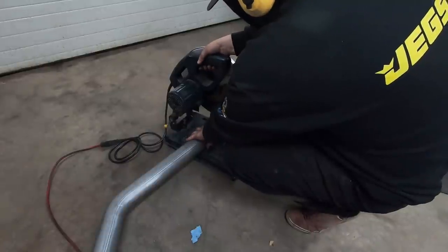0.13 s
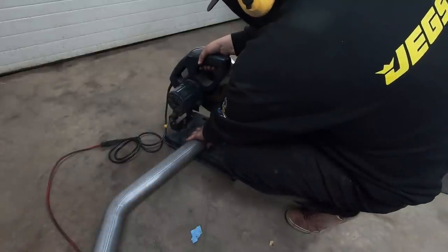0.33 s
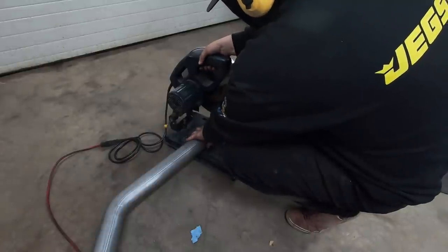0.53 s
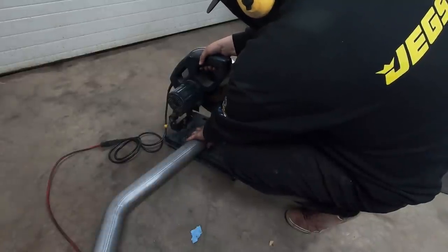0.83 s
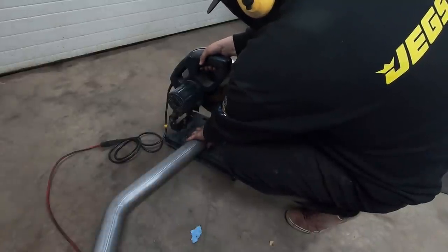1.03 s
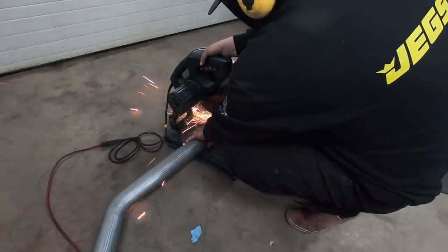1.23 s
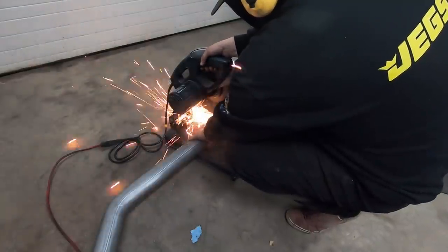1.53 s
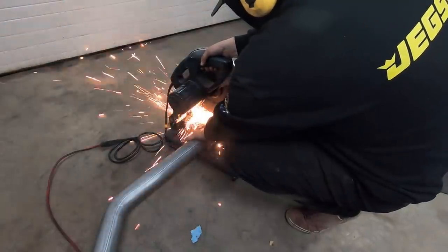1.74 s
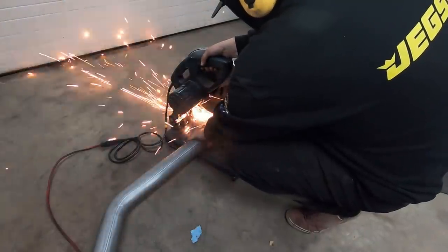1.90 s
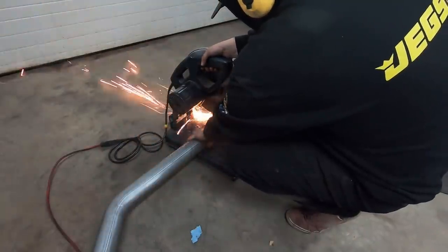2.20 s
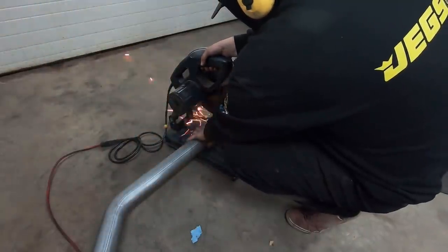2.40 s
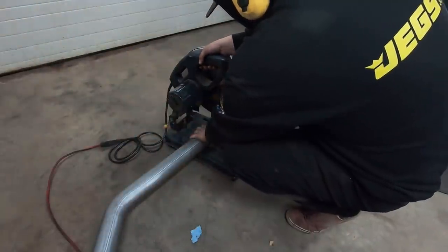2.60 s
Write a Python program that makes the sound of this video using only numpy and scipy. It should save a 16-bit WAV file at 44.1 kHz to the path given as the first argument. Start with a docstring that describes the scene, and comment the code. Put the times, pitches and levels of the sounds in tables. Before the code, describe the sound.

An abrasive chop saw runs freely in a garage, its gear whine rising over a motor roar. Halfway through, it jumps to a shrill, sped-up grinding as it cuts steel pipe, sagging in pitch, then recovering. Heard close by.

```python
"""Abrasive chop saw in a garage

The saw first runs up freely: gear whine over motor roar. Then time runs five times faster, so every
pitch is five times higher: the wheel grinds into steel pipe, slows under load, knocks once a turn and
recovers as it breaks through. The tones are orders, multiples of the wheel's rotation rate; the motor
also drives the fixed resonances of guard, base and pipe."""
import sys
import numpy as np
from scipy import signal
from scipy.fft import rfft, irfft, next_fast_len
from scipy.io import wavfile
from scipy.ndimage import uniform_filter1d, map_coordinates

SR = 44100
rng = np.random.default_rng(int(sys.argv[2]) if len(sys.argv) > 2 else 0)


def master_out(mix):
    """Clip the mix to full scale and print it as 16-bit PCM to the path in sys.argv[1]."""
    frames = np.transpose(np.atleast_2d(mix))
    ceiling = np.clip(frames, -1, 1)
    pcm = np.round(ceiling * 32767).astype(np.int16)
    wavfile.write(sys.argv[1], SR, pcm)


N = 121275
T = np.arange(N) / SR
SPEED_UP_S, SPEED_UP = 1.225, 5
NATURAL, FAST = T < SPEED_UP_S, T >= SPEED_UP_S
TOP_HZ = 15750
EAR_SPLIT = np.array([[.5], [-.5]])  # shares a difference between left and right


def amp(db):
    """Decibels to amplitude ratio."""
    return 10 ** (np.asarray(db) / 20)


def unit(x):
    """Normalisation to an rms of 1."""
    return x / np.sqrt(np.mean(np.abs(x) ** 2) + 1e-20)


def along(points, hz):
    """Interpolation of (frequency or order, value) points on a logarithmic axis."""
    knots, values = np.transpose(points)
    return np.interp(np.log(hz + 1), np.log(knots + 1), values)


def curves(rows):
    """Linear interpolation in time: one curve for each column after the first."""
    times, *columns = np.transpose(rows)
    return [np.interp(T, times, column) for column in columns]


def wobble(clock):
    """Random modulation: a smooth curve with one knot per unit of clock."""
    return map_coordinates(rng.standard_normal(int(clock[-1]) + 3), [clock], order=2)


def filtered(x, response):
    """Linear filtering: the spectrum of x times a frequency response."""
    size = next_fast_len(N + 8192)
    return irfft(rfft(x, size) * response(np.fft.rfftfreq(size, 1 / SR)), size)[..., :N]


def rush(spectrum, correlation, left_db, patch_db):
    """Partially coherent stereo noise of rms 1, its gain patchy in time and frequency."""
    cells = signal.stft(rng.standard_normal((2, N)), nperseg=1024)[2]
    patches = uniform_filter1d(rng.standard_normal(cells.shape[1:]), size=3, axis=0)
    patches = unit(uniform_filter1d(patches, size=6, axis=1))
    pair = signal.istft(cells * amp(patch_db * patches), nperseg=1024)[1][:, :N]
    angle = lambda hz: np.arccos(np.clip(along(correlation, hz), -1, 1)) / 2
    mid, side = filtered(pair, lambda hz: amp(along(spectrum, hz)) * [np.cos(angle(hz)), np.sin(angle(hz))])
    ears = np.array([mid + side, mid - side])
    return unit(filtered(ears, lambda hz: amp(along(left_db, hz) * EAR_SPLIT)))


def tone(order, turns, rms):
    """One order of the rotation, with an interaural phase difference."""
    # Phase lead of the left ear, before a random scaling: order, lead_rad
    leads = [(2, .1), (3, 0.95), (4, .3), (5, 0.065), (13, 0.06), (16, 0.47), (24, 0.65), (43, 1.16),
             (80, 0.79), (130, 0.91)]
    phase = 2 * np.pi * order * turns + rng.uniform(0, 2 * np.pi)
    lead = along(leads, order) * rng.uniform(0.41, 1.04)
    return np.sqrt(2) * rms * np.sin(phase + lead * EAR_SPLIT)


def motor_roar():
    """Broadband machine noise of motor, fan and housing at natural speed."""
    # Envelope: time_s, level_db
    levels = [(0.0, -19), (0.032, -19), (0.464, -19.5), (0.532, -20), (0.55, -19), (1.192, -18.5),
              (1.22, -19)]
    # Spectral density: frequency_hz, relative_db
    spectrum = [(15, -54), (25, -46), (64, -26), (120, -23.5), (180, -14), (317, -20.5), (394, -5),
                (451, -16), (607, -10.5), (734, 2), (818, -6), (1070, -5), (1190, -10), (1700, -7),
                (1940, -5.5), (2280, -8), (3620, -7.5), (5430, -12), (7920, -9), (10100, -16), (11300, -35),
                (14000, -35), (16000, -59)]
    # Likeness of the ears: frequency_hz, correlation
    likeness = [(60, 0.73), (99, 0.54), (160, 0.96), (270, 0.93), (450, 0.91), (740, 0.52), (1220, 0.37),
                (2010, 0.26), (3330, 0.9), (5500, 0.043), (9080, -0.17), (15000, 0.14)]
    # Balance: frequency_hz, left_over_right_db
    balance = [(60, 6), (240, -2.7), (950, 3), (3770, 0.6), (15000, -1)]
    level_db = curves(levels)[0] - 1.5 + 1.14 * wobble(14 * T)
    return amp(level_db) * rush(spectrum, likeness, balance, patch_db=1.5) * NATURAL


def body_resonance():
    """Forced vibration: the motor rings guard, base and pipe; the speed-up raises and widens each mode."""
    # Modes, frequencies at natural speed: pitch_hz, width_hz, natural_level_db, fast_level_db
    modes = [(79, 12, -55, -60), (164.9, 3.3, -59, -53.5), (288.4, 14, -50.5, -58.5),
             (411.6, 17, -41, -45.5), (483, 6.6, -48, -45.5), (529.6, 39, -41, -41.5),
             (602.4, 14, -42, -45), (729, 30, -39.5, -37.5), (816, 2.4, -48, -45), (901, 29, -40.5, -45.5),
             (1095, 18, -49, -51), (1191, 20, -48, -53.5), (1285, 9.2, -43, -41.5)]
    out = 0
    for speed, column, active in ((1, 0, NATURAL), (SPEED_UP, 1, FAST)):
        def response(hz):
            return sum(amp(db[column]) / np.sqrt(speed * width) / (1 + (2 * (hz / speed - pitch) / width) ** 2)
                       for pitch, width, *db in modes)
        mid, side = filtered(rng.standard_normal((2, N)), response) * np.sqrt(2 * SR / np.pi)
        out = out + active * np.array([mid + .033 * side, mid - .033 * side])
    return out


def grinding(turns):
    """Abrasion noise of grit and motor in three bands, amplitude-modulated once a turn."""
    # Band envelopes: time_s, low_db, middle_db, treble_db
    levels = [(1.23, -47, -28.5, -31), (1.4, -48.5, -29, -29.5), (1.54, -47, -27.5, -31),
              (1.66, -45, -28.5, -27.5), (1.78, -47.5, -32, -27.5), (1.9, -43, -26, -28),
              (2.0, -48, -29, -32), (2.27, -50, -32, -31.5), (2.44, -47.5, -29.5, -30.5),
              (2.49, -51.5, -26.5, -31.5), (2.56, -52.5, -30, -29.5), (2.65, -48, -28.5, -28.5),
              (2.75, -50.5, -26, -27)]
    # Offset added to each envelope: gain_db
    trims = [4, 0, 4.5]
    # Spectral density of each band: frequency_hz, relative_db
    spectra = [
        [(18, -59), (30, -36), (209, -11), (418, -3.5), (539, -3), (769, -5.5), (836, 2.5), (1110, -1.5),
         (1540, -4.5), (1700, -2.5), (2210, -18), (3740, -120)],
        [(1000, -41), (1700, -8.5), (1990, 4), (2270, -10.5), (2440, -16.5), (2800, -8.5), (2970, -8),
         (3240, -1), (3670, -0.5), (4330, -3.5), (5690, -0.5), (6220, 0.5), (7000, -20), (9100, -22),
         (15400, -120)],
        [(4120, -38), (7000, -5), (9360, -4), (11800, -5.5), (15100, -8), (16000, -12)],
    ]
    # Likeness of the ears: frequency_hz, correlation
    likeness = [(60, 0.84), (99, 0.65), (160, 0.29), (270, 0.77), (450, 0.55), (740, 0.96), (1220, 0.87),
                (2010, 1), (3330, 0.75), (5500, 0.085), (9080, 0.34), (15000, 0.69)]
    # Balance: frequency_hz, left_over_right_db
    balance = [(60, 0.0), (240, 0.043), (950, 0.0), (3770, 0.67), (15000, 1.6)]
    pulse = 1 + .095 * np.cos(2 * np.pi * turns)
    bands = sum(amp(level + trim + .6 * wobble(12 * T)) * rush(spectrum, likeness, balance, patch_db=2.5)
                for level, trim, spectrum in zip(curves(levels), trims, spectra))
    return pulse * bands * FAST


def wheel_rotation():
    """Rotation under load: the heard turns per second and their integral, the turns so far."""
    # Free run-up: time_s, rotation_hz
    run_up = [(0, 41.4), (.085, 42.3), (.2, 44), (.36, 45.1), (.55, 46.3), (.79, 47.6), (1.0, 48.3),
              (1.225, 49)]
    # Cutting, before the speed-up multiplies the rate: time_s, rotation_hz
    cutting = [(1.225, 49.8), (1.34, 49.4), (1.47, 48.1), (1.55, 47.6), (1.63, 46.95), (1.68, 45.4),
               (1.72, 44.7), (1.78, 44.1), (1.86, 43.2), (1.92, 42), (2.0, 41.05), (2.27, 41.45),
               (2.42, 40.7), (2.5, 43.2), (2.55, 45.4), (2.62, 47.3), (2.75, 49.2)]
    rate = np.where(NATURAL, curves(run_up)[0], SPEED_UP * curves(cutting)[0])
    return rate, np.cumsum(rate) / SR


def wheel_singing(turns):
    """Single orders swell and fade; phase modulation by the unsteady wheel roughens high ones most."""
    # Swells: start_s, end_s, order, level_db, edge_s
    swells = [(.37, .82, 15.85, -27.5, .02), (.47, .55, 15.85, -28, .02), (.84, .95, 15.85, -36, .02),
              (1.25, 1.4, 2, -53, .03), (1.33, 1.62, 3, -45, .04), (1.26, 1.53, 4, -50, .03),
              (1.48, 1.52, 5, -43, .01), (1.56, 1.64, 5, -40, .015), (1.51, 1.63, 10, -39, .015),
              (1.555, 1.6, 10, -38, .01), (1.6, 1.68, 16, -33, .02), (1.63, 1.75, 2, -40, .025),
              (1.54, 2.46, 2, -45.5, .025), (1.67, 1.91, 3, -44.5, .02), (1.97, 2.45, 3, -48, .02),
              (1.92, 2.42, 4, -46, .03), (1.62, 1.7, 33, -37, .015), (1.63, 1.7, 31, -38, .015),
              (1.98, 2.42, 7, -47, .03), (1.93, 2.32, 8, -45, .03), (1.62, 1.72, 26, -34, .015),
              (1.72, 1.82, 26, -41, .015), (1.59, 1.64, 36, -32, .015), (1.67, 1.73, 36, -33, .015),
              (1.74, 1.79, 33, -34, .015), (1.75, 1.82, 21, -34.5, .015), (1.84, 1.88, 39, -33, .015),
              (1.85, 1.9, 28, -37, .015), (1.86, 1.9, 14, -33, .015), (1.87, 1.92, 11, -34, .015),
              (2.15, 2.38, 29, -39, .04), (2.545, 2.655, 16, -28.5, .008), (2.555, 2.58, 16, -30, .006),
              (2.655, 2.72, 16, -36, .01), (2.63, 2.67, 17, -35, .01), (2.705, 2.735, 15, -33, .01),
              (1.95, 2.4, 10, -41, .03), (1.93, 2.35, 51, -42, .03), (2.1, 2.33, 55, -42, .03),
              (1.97, 2.08, 44, -37, .015), (2.27, 2.37, 44, -39, .015)]
    jitter_turns, waver_db = .0022, 1.6
    step = lambda u: .5 + .5 * np.tanh(u)
    out = 0
    for order in sorted({row[2] for row in swells}):
        envelope = sum(amp(db) * step((T - start) / edge) * step((end - T) / edge)
                       for start, end, k, db, edge in swells if k == order)
        unsteady = turns + jitter_turns * wobble(.5 * turns)
        out = out + tone(order, unsteady, envelope * amp(waver_db * wobble(22 * T)))
    return out


def wheel_knock(rate, turns):
    """Periodic impact: one strike on the pipe per turn gives a comb of orders, each drifting in level."""
    # Envelope: time_s, level_db
    levels = [(1.226, -45), (1.51, -39.5), (1.71, -42.5), (1.96, -39), (2.21, -41.5), (2.41, -41),
              (2.49, -41), (2.74, -66)]
    # Weight of the orders: frequency_hz, gain_db
    spectrum = [(1000, -19.5), (2000, -2.5), (4000, -16), (8000, -11.5), (12000, -9.5), (16000, -0.5)]
    drift_db, drift_hz = 4, 12
    comb = 0
    for order in [5, 6, *range(9, 77)]:
        gain_db = along(spectrum, order * rate) + drift_db * wobble(drift_hz * T)
        comb = comb + tone(order, turns, amp(gain_db) * (order * rate < TOP_HZ))
    return amp(curves(levels)[0]) * comb * FAST


def gear_whine(rate, turns):
    """Tooth-mesh harmonics; unloaded gears rattle, modulating them into sidebands and a noise haze."""
    # Mesh envelope: time_s, level_db, rattle_fraction, overtone_db
    mesh = [(0, -23, 0.5, -5), (.2, -25.5, 0.9, 3), (.6, -25, 0.7, 1.5), (.9, -25.5, 0.75, 4),
            (1.22, -21, 0.43, -0.5), (1.23, -28.5, 0.87, 2), (1.6, -30, 1, 0), (1.9, -41, 1, 0),
            (1.99, -25.5, 0.33, 0), (2.2, -22.5, 0.36, 0), (2.38, -28.5, 0.45, 0), (2.46, -26.5, 0.98, 0),
            (2.6, -31, 1, 0), (2.75, -31, 1, -6)]
    # Mesh harmonics 1-4: level_db, sideband_fall_db_per_order, width_orders
    harmonics = [(0, 3.2, .45), (-5.5, 4, .45), (-9, 2, 1.1), (-18, 2, .6)]
    # Haze relative to the mesh tone at full rattle: natural_db, fast_db
    haze_db = [-2, -0.5]
    # The gears stand to the left; left over right: natural_db, fast_db
    left_db = [0.5, 4.5]
    teeth, haze_orders = 43, 8
    rattle_waver_db, clean_waver_db = 4, 2.2
    level_db, rattle, overtone_db = curves(mesh)
    rattle = np.clip(rattle, 0, 1)
    haze = amp(np.where(NATURAL, *haze_db)) * rattle
    out = sum(tone(teeth, turns + lag / teeth, haze * wobble(haze_orders * turns)) for lag in (0, .25))
    for harmonic, (db, fall_db, width) in enumerate(harmonics, 1):
        gain = (harmonic * teeth * rate < TOP_HZ) * amp(db + overtone_db * (harmonic > 1))
        for sideband in range(-4, 5):
            order = harmonic * teeth + sideband
            rattling = rattle * amp(rattle_waver_db * wobble(width * turns) - fall_db * abs(sideband))
            clean = (1 - rattle) * (sideband == 0) * amp(clean_waver_db * wobble(30 * T))
            jitter_turns = (.1 + rattle) * wobble(width * turns) / (4 * order)
            out = out + tone(order, turns + jitter_turns, (rattling + clean) * gain)
    return amp(level_db - 7.5 + np.where(NATURAL, *left_db) * EAR_SPLIT) * out


def scene():
    """Superposition of the saw's tones, slightly to the left, and its noise."""
    rate, turns = wheel_rotation()
    tones = gear_whine(rate, turns) + wheel_knock(rate, turns) + wheel_singing(turns) + body_resonance()
    return tones * amp(1.4 * EAR_SPLIT) + motor_roar() + grinding(turns)


def record(dry):
    """Soft saturation rounds the highest peaks; a low-pass filter limits the band."""
    ceiling = .56
    soft = dry / (1 + np.abs(dry / ceiling) ** 6) ** (1 / 6)
    return filtered(soft, lambda hz: hz < TOP_HZ)


dry = scene()
out = record(dry)
master_out(out)
```